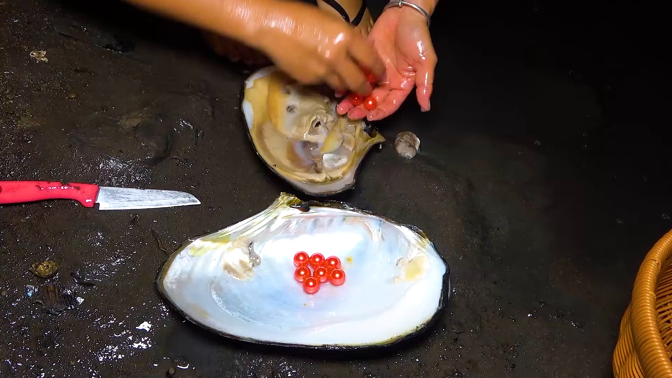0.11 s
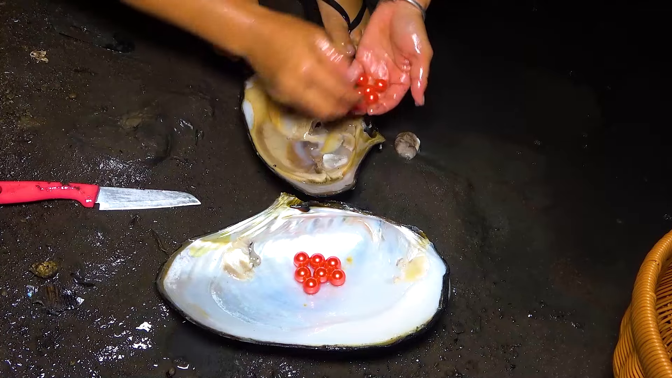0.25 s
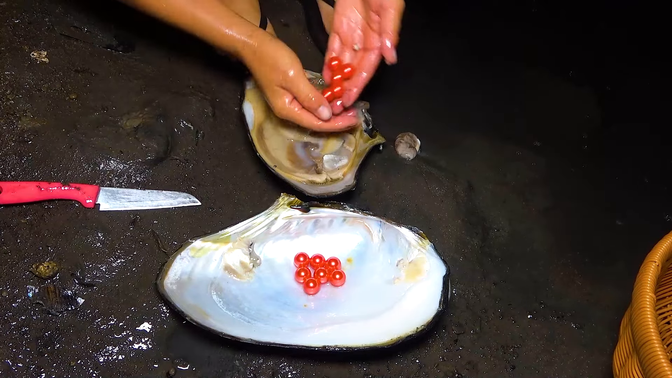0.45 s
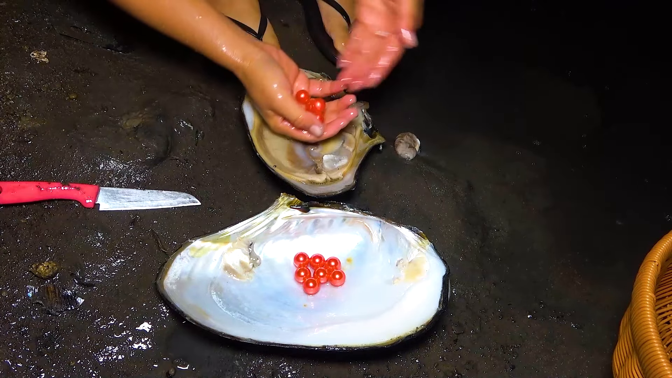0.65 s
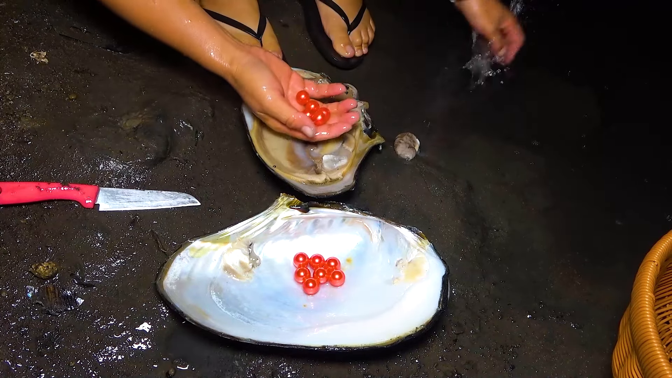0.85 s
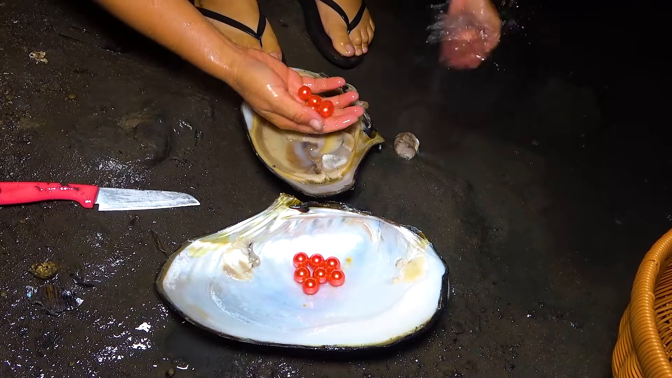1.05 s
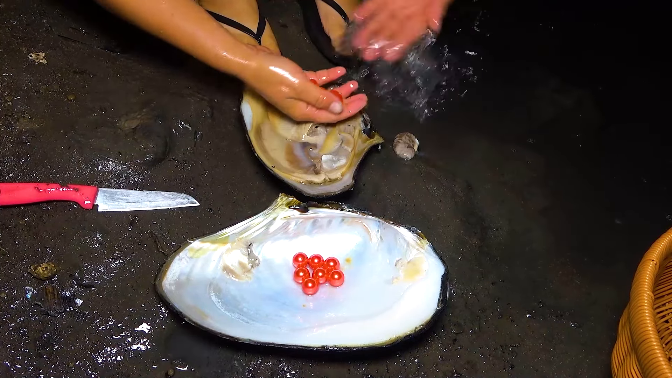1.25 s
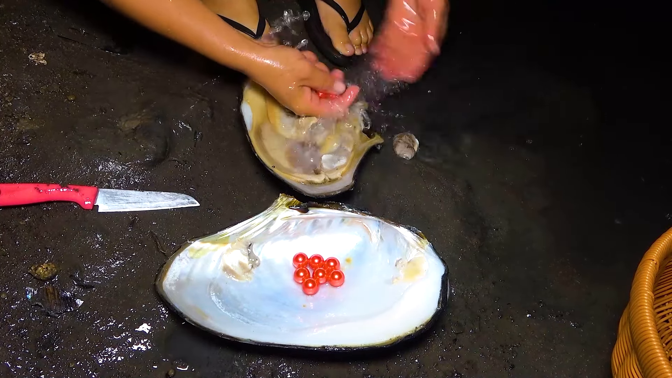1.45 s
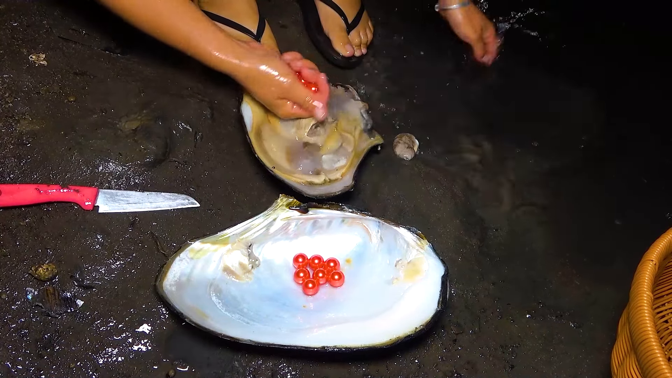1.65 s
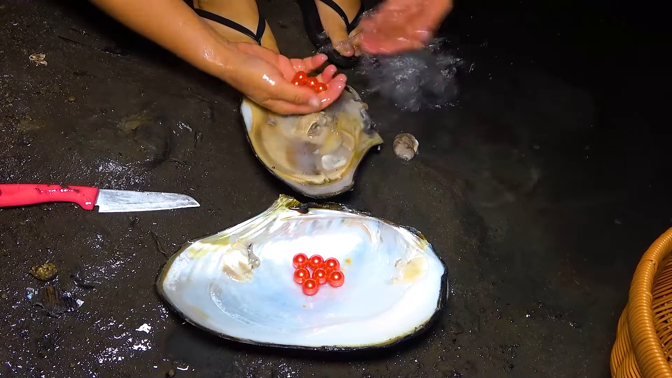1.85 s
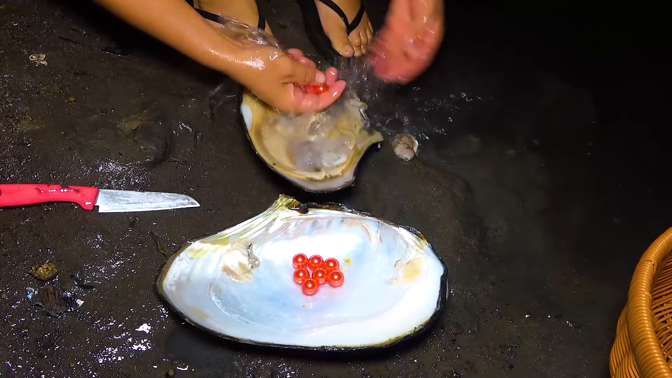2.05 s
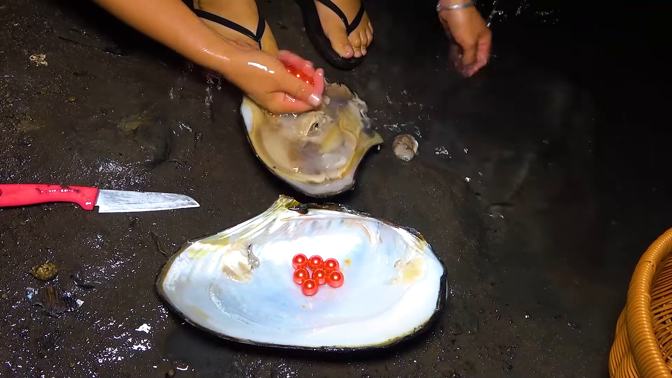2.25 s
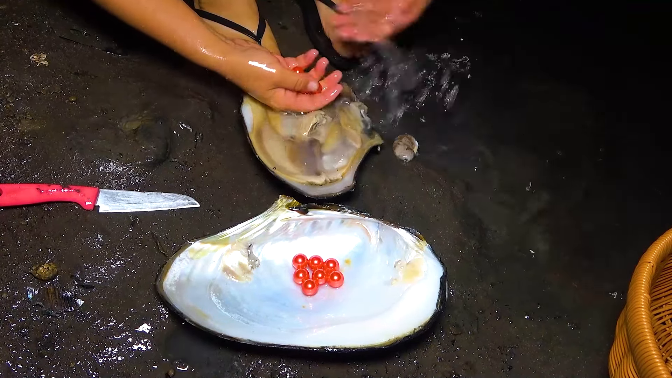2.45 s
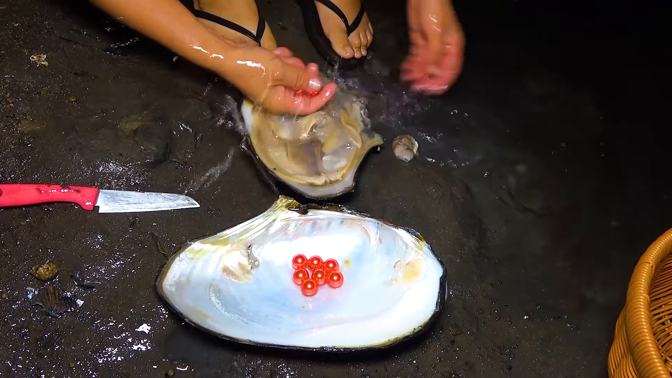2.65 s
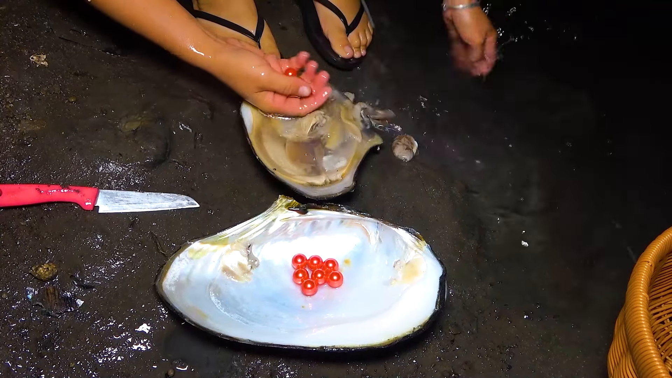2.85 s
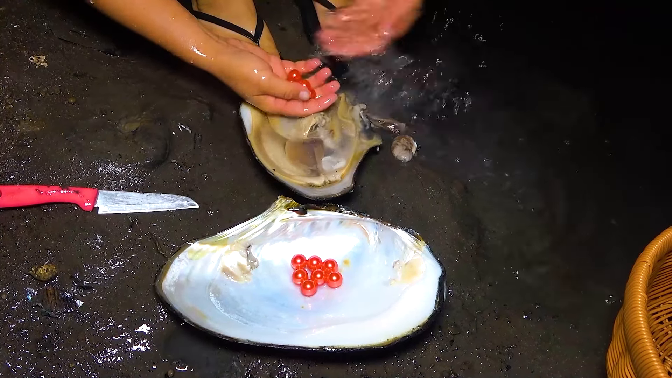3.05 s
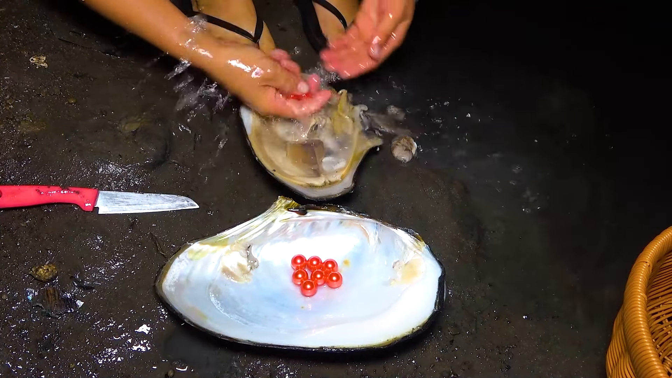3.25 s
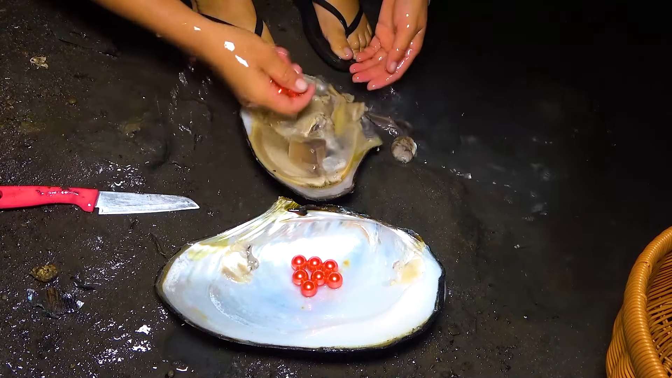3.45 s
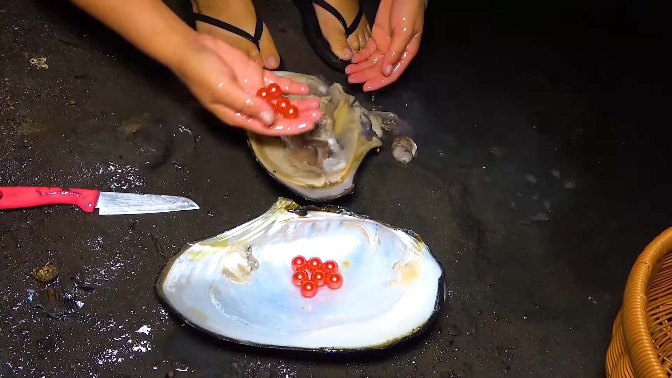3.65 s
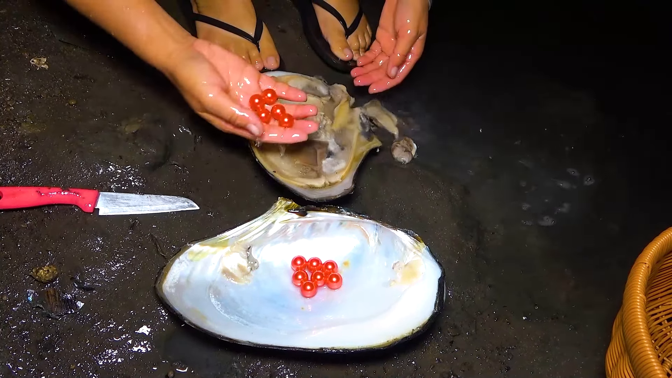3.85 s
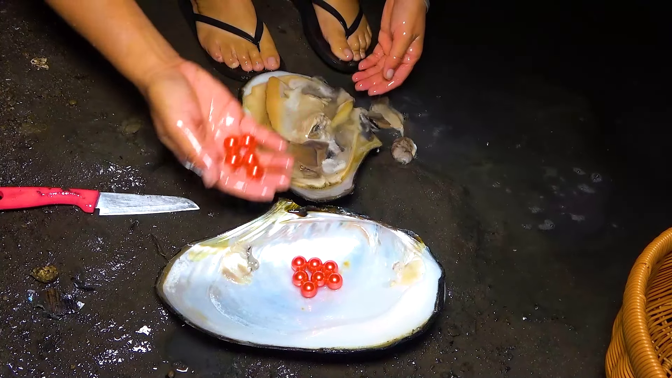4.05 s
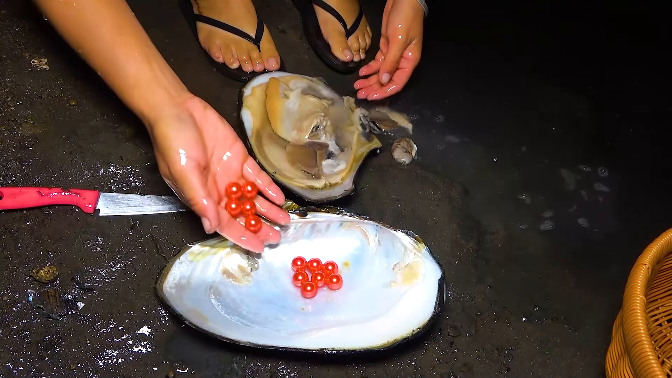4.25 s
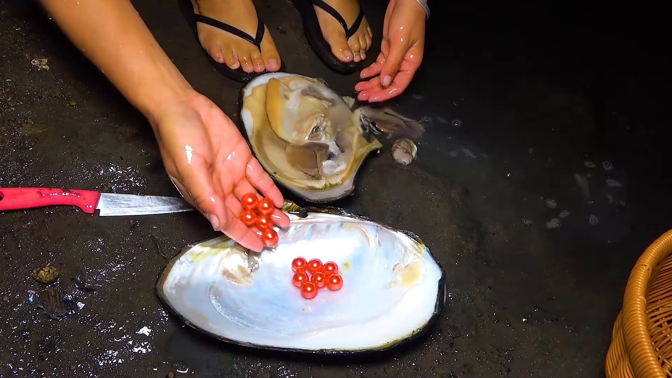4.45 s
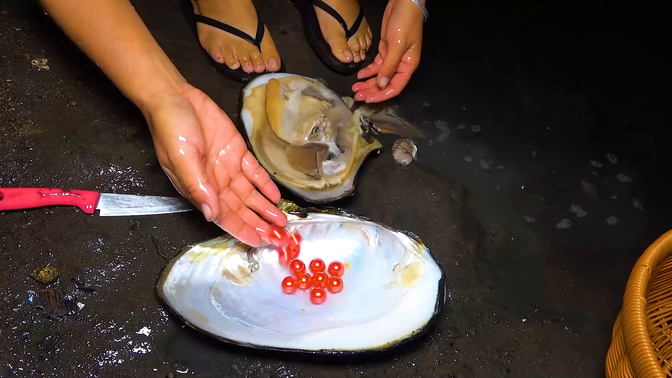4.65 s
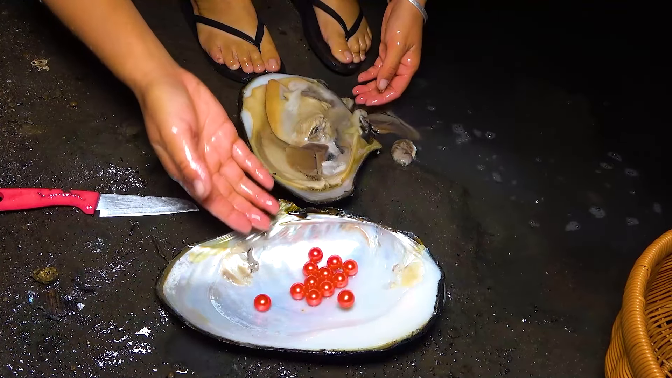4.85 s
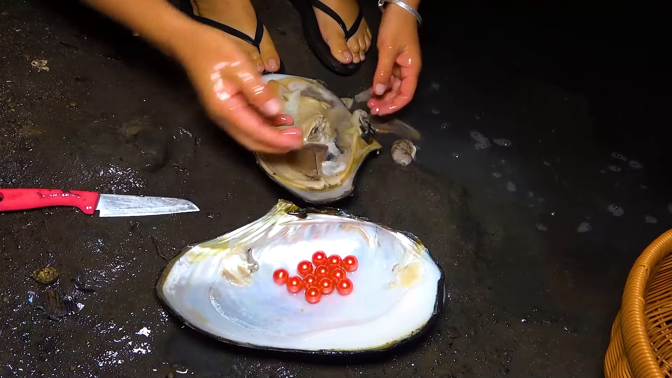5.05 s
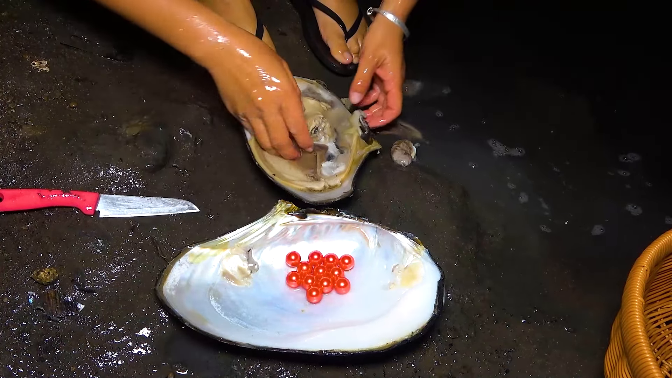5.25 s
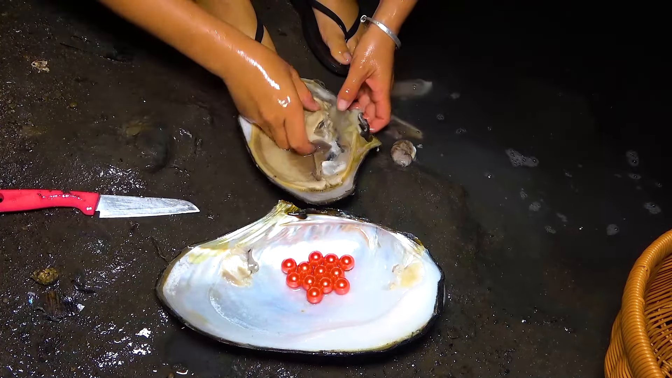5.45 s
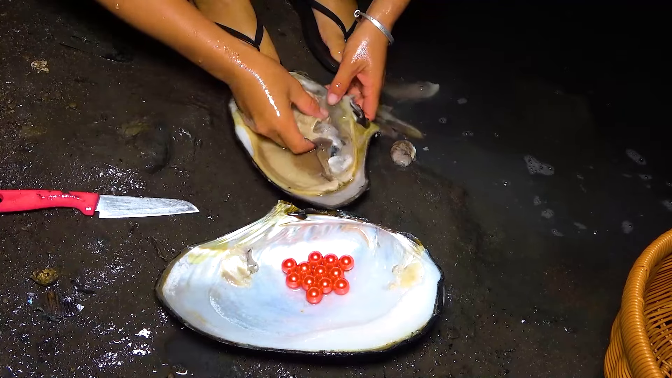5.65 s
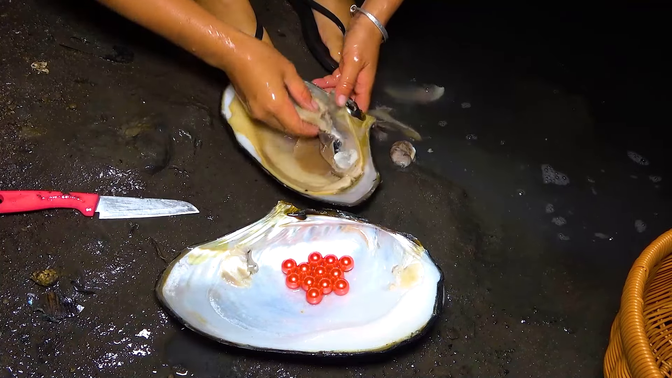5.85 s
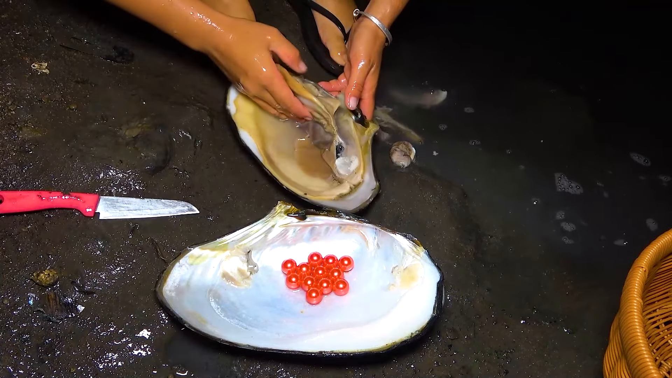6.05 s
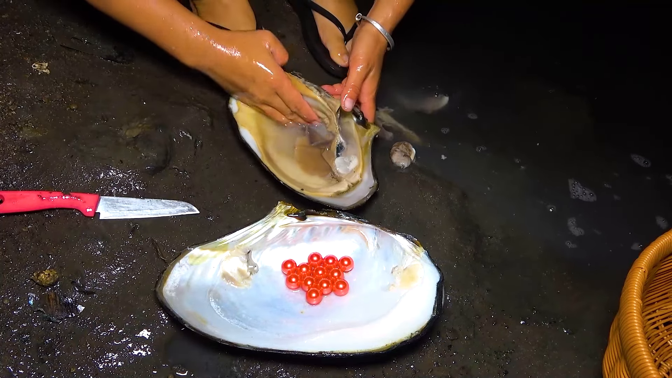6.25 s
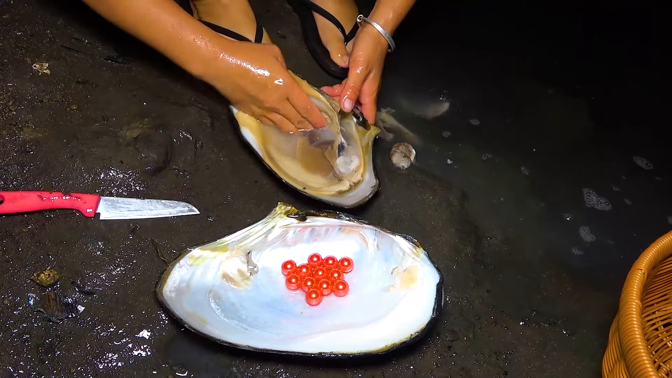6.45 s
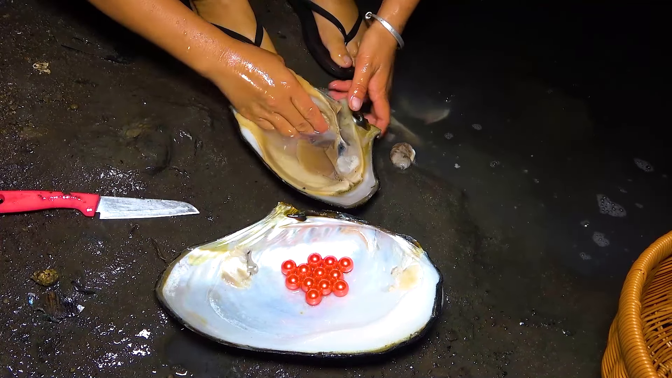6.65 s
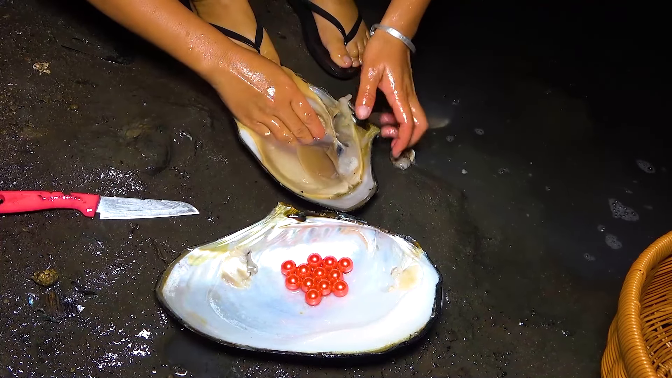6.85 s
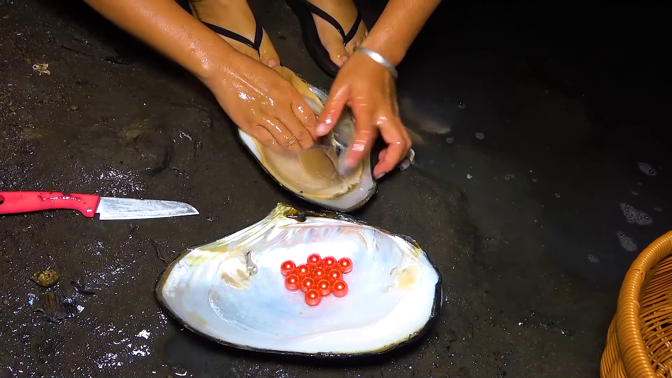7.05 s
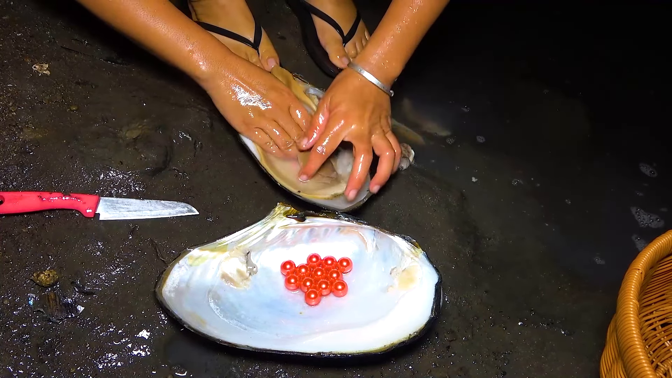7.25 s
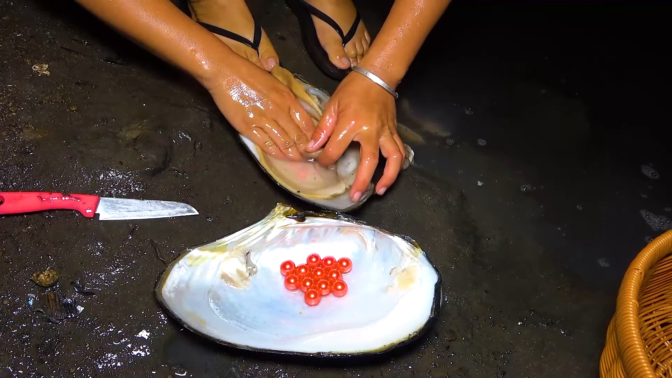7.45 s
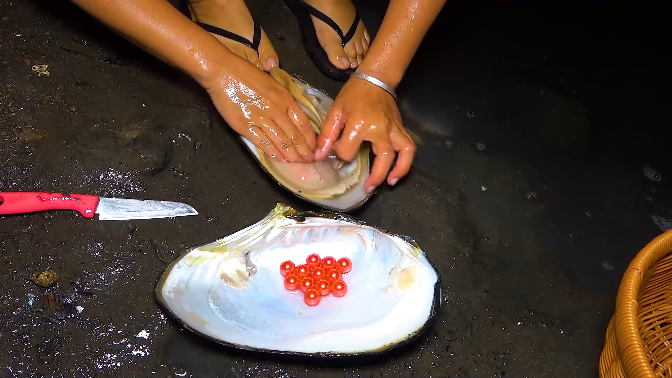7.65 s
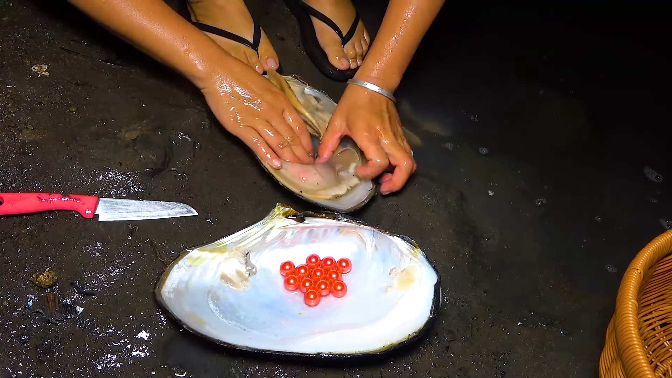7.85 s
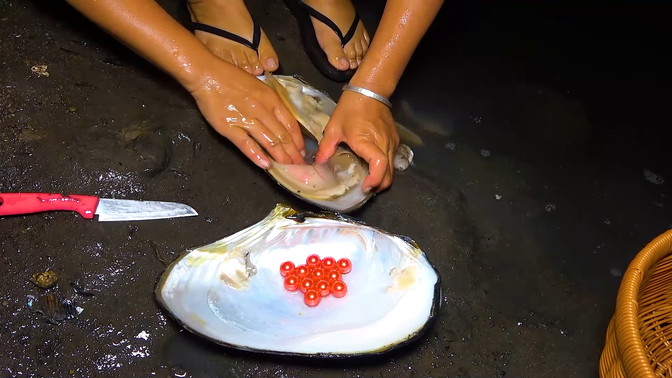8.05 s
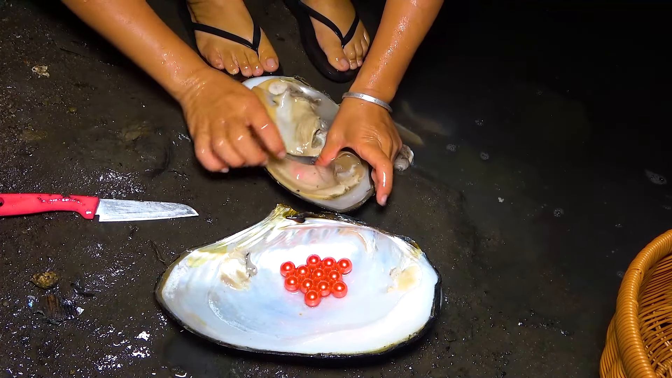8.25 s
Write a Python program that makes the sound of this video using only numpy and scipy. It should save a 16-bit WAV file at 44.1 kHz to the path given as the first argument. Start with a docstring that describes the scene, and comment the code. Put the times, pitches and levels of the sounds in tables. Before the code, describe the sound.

Small pearls click in a wet palm, a hand splashes shallow water four times, pearls bounce ringing into a shell, then dull wet mussel knocks.

```python
"""Over quiet air, pearls click in a palm; then a hand scoops water from a shallow pool and throws it four times.
The water is clouds of ringing bubbles, hissing spray and single plops; it drains away into soft high hisses.
Pearls then drop and bounce into an empty shell, which cracks and rings at its own pitches.
Last, fingers work in a wet mussel with dull, damped knocks. All is nearly mono, with a long reverberation."""
import sys
import numpy as np
from scipy import signal
from scipy.fft import rfft, irfft, next_fast_len
from scipy.io import wavfile
from scipy.ndimage import uniform_filter1d, minimum_filter1d, map_coordinates

SR = 44100
rng = np.random.default_rng(int(sys.argv[2]) if len(sys.argv) > 2 else 0)


def master(y):
    """Save y as 16-bit WAV."""
    cut = np.clip(np.atleast_2d(y).T, -1, 1)
    pcm = np.round(cut * 32767)  # scale
    wavfile.write(sys.argv[1], SR, pcm.astype(np.int16))


N = 366030


def amp(db):
    """Turn decibels into a gain."""
    return 10 ** (np.asarray(db) / 20)


def unit(x):
    """Scale a sound to an average (rms) level of 1."""
    return x / np.sqrt(np.mean(x ** 2) + 1e-20)


def peaked(x):
    """Scale a sound so that its peak is 1."""
    return x / (np.abs(x).max() + 1e-20)


def sized(x):
    """Scale a short sound to the energy of one millisecond at rms 1."""
    return x / np.sqrt(np.sum(x ** 2) * 1000 / SR + 1e-20)


def along(points, hz):
    """Read values between (Hz, value) points, on a log frequency axis."""
    f, v = np.transpose(points)
    return np.interp(np.log(hz + 1), np.log(f + 1), v)


def filtered(x, response):
    """Multiply the spectrum of a whole track by a response of frequency."""
    m = next_fast_len(N + SR // 2)
    hz = np.fft.rfftfreq(m, 1 / SR)
    return irfft(rfft(x, m) * response(hz), m)[..., :N]


def coloured(x, gain_db, size=4096):
    """Filter a short sound to a dB response without any sound before its start."""
    wanted = amp(gain_db(np.fft.rfftfreq(size, 1 / SR)))
    # folding the cepstrum forward in time makes the filter causal
    cepstrum = irfft(np.log(np.maximum(wanted, 1e-6)))
    cepstrum[1:size // 2] *= 2
    cepstrum[size // 2 + 1:] = 0
    return irfft(rfft(x, size) * np.exp(rfft(cepstrum)))


def add(track, s, sound):
    """Mix a sound into the track at time s."""
    part = track[max(round(s * SR), 0):][:len(sound)]
    part += sound[:len(part)]


def noise(spectrum):
    """Coloured noise of rms 1."""
    return unit(filtered(rng.standard_normal(N), lambda hz: amp(along(spectrum, hz))))


def wobble(rate):
    """A smooth random curve with a given number of random points a second."""
    points = rng.standard_normal(2048)
    return map_coordinates(points, [np.arange(N) * rate / SR], order=2, mode="wrap")


def swell(s, rise, fall):
    """A gain that climbs 20 dB in the rise time, peaks at s and sinks 20 dB in the fall time."""
    t = np.arange(N) / SR - s
    return amp(-20 * np.maximum(-t / rise, t / fall))


def snap(t60, rattle, size=4096):
    """A hard contact: one impulse, then a random scatter that sinks 60 dB in t60 seconds."""
    t = np.arange(size) / SR
    return (t == 0) + rattle * rng.standard_normal(size) * amp(-60 * t / t60)


def bubble(t, hz, cycles, rise):
    """A bubble dies by 60 dB over some cycles; its pitch rises as it nears the surface."""
    age = t * hz / cycles
    tone = np.sin(2 * np.pi * hz * t * (1 + rise * np.minimum(age, 1) / 2))
    onset = 1 - np.exp(-2 * hz * t)
    return tone * amp(-60 * age) * onset


def ringing(modes, near_hz, focus_db, size=4096):
    """A struck shell rings in its modes; the place that is struck favours those near one pitch."""
    hz, width, db = np.transpose(modes)[:, :, None]
    t = np.arange(size) / SR
    # each strike varies a little
    strength = amp(db + rng.standard_normal(hz.shape) - focus_db * np.abs(np.log2(hz / near_hz)))
    sign = rng.choice([-1, 1], hz.shape)
    tones = np.sin(2 * np.pi * hz * t) * np.exp(-np.pi * width * t)  # a wide mode dies quickly
    return sized(np.sum(strength * sign * tones, axis=0))


# colour of the quiet air, before it is set to AIR_DB: [f/Hz, level/dB]
AIR_COLOUR = [(15, -43.5), (25, -11.5), (285, -9), (451, -8.5), (818, -4), (1190, -5), (1650, -19),
              (3340, -17), (5730, -17), (8590, -20.5), (16000, -25)]
AIR_DB = -59


def quiet_air():
    """Still air is a steady, faint coloured noise."""
    return amp(AIR_DB) * noise(AIR_COLOUR)


# sharp wet ticks of pearls, drops and shell: [t/s, relative level/dB, centre f/Hz]
TICKS = [(0.106, -24, 5000), (0.2857, -11, 7400), (0.343, -14.5, 5900), (0.377, -22, 5200),
         (0.590, -12.5, 8900), (0.604, -11, 7200), (0.645, -16, 4800), (0.913, -10.5, 5300),
         (1.077, -6, 2900), (1.752, 1, 5700), (2.785, -8, 8000), (3.352, -18.5, 3450), (4.41, -23.5, 5800),
         (5.727, -31.5, 3000), (6.229, -34.5, 3500), (7.213, -29, 4500), (7.627, -25.5, 6700)]
# runs of fainter ticks, as pearls settle or last drops fall:
# [start t/s, end t/s, middle of relative level/dB, middle of centre f/Hz]
PATTER = [(0.601, 0.699, -20, 6250), (3.544, 3.861, -31.5, 10500)]
# colour shared by all ticks: [f/Hz, level/dB]
TICK_COLOUR = [(300, -40.5), (1200, -5.5), (2500, -2.5), (8000, -4), (11000, -14), (16000, -30)]


def ticks():
    """Tiny hard contacts: a spike with a few milliseconds of broad ring."""
    out = np.zeros(N)
    faint = []
    for start, end, db, hz in PATTER:
        for u, v, w in rng.random(size=(5, 3)):
            faint.append((start + u * (end - start), db + 6 * (v - .5), hz * 2 ** (w - .5)))
    for s, db, hz in list(TICKS) + faint:
        contact = snap(t60=.019, rattle=.14)
        tick = coloured(contact, lambda f: along(TICK_COLOUR, f) - 9 * np.abs(np.log2((f + 1) / hz)))
        add(out, s, amp(db - 7) * sized(tick))
    return out


# how long the echo takes to sink by 60 dB: [f/Hz, duration t/s]
ECHO_T60 = [(150, 0.18), (500, 1.72), (1500, 1.46), (4000, 1.14), (8000, 1.03), (14000, 1.31)]
# colour of the echo: [f/Hz, level/dB]
ECHO_COLOUR = [(100, -21.5), (300, -5.5), (600, 0), (1500, -3.5), (4500, -3), (8000, -8.5), (14000, -12.5)]


def reverberation(x, delay, count):
    """A long tail whose deep bass dies first; its fine pattern keeps changing."""
    hz, t, z = signal.stft(rng.standard_normal((count, 2 * SR)), SR, nperseg=256)
    fading = amp(-60 * t / along(ECHO_T60, hz)[:, None])
    tails = signal.istft(z * fading, SR, nperseg=256)[1]
    tails = tails / np.linalg.norm(tails[0])
    tails = np.pad(tails, ((0, 0), (int(delay * SR), 0)))
    # the tails take turns at constant power
    turn = np.arange(N) / SR * 14 + np.arange(count)[:, None] / count
    shares = np.cos(2 * np.pi * turn / 2) * np.sqrt(2 / count)
    wet = signal.fftconvolve(x * shares, tails, axes=1)[:, :N].sum(axis=0)
    return filtered(wet, lambda f: amp(along(ECHO_COLOUR, f)))


# the hand pulls through the pool: [peak t/s, rise t/s, bubbling level/dB, deep churn level/dB]
SCOOPS = [(1.03, .1, -23, -46.5), (1.35, 0.23, -22, -32), (1.85, .04, -23, -29), (2.41, .03, -26, -36),
          (3.04, 0.2, -28, -42.5)]
SCOOP_FALL_S, SCOOP_SPRAY_DB = 0.15, -14.5  # time to sink by 20 dB; spray against bubbling
# a thrown handful lands: [peak t/s, rise t/s, spray level/dB]
THROWS = [(1.44, 0.11, -23.5), (2.095, 0.12, -25), (2.692, 0.19, -27.5), (3.255, 0.16, -27.5)]
THROW_FALL_S, THROW_CHURN_DB = .15, -16.5  # time to sink by 20 dB; churn against spray
# water runs off the hands between throws, then drains away; bubbling is against the trickle's spray
TRICKLE_DB, TRICKLE_BUBBLING_DB, DRAIN_FROM_S, DRAIN_DB_PER_S = -44, -15, 3.31, 49
WET_FROM_S, WET_UNTIL_S = 0.88, 4.0  # the span in which bubbles start


def water_motion():
    """Gains of churn, bubbling and spray: scoops mostly bubble, throws do both, a trickle joins them."""
    t = np.arange(N) / SR
    trickle = amp(TRICKLE_DB - DRAIN_DB_PER_S * np.maximum(t - DRAIN_FROM_S, 0))
    power = np.outer([0, amp(TRICKLE_BUBBLING_DB), 1], trickle) ** 2
    for s, rise, db, churn_db in SCOOPS:
        levels = amp([churn_db, db, db + SCOOP_SPRAY_DB])
        power += np.outer(levels, swell(s, rise, SCOOP_FALL_S)) ** 2
    for s, rise, db in THROWS:
        levels = amp([db + THROW_CHURN_DB, db, db])
        power += np.outer(levels, swell(s, rise, THROW_FALL_S)) ** 2
    return np.sqrt(power) * (t > WET_FROM_S)


def bubbles(hz, spread, cycles, scatter_db, count, size):
    """A cloud of bubbles of random pitch and strength, rms 1 over the wet span."""
    start, end = WET_FROM_S, WET_UNTIL_S
    when, strength = rng.random((2, count, 1))
    pitch = np.clip(hz * np.exp(spread * rng.standard_normal((count, 1))), 80, 16000)
    gain = amp(-scatter_db * np.log(np.maximum(strength, .02))) * np.sqrt(pitch / hz)
    grains = gain * bubble(np.arange(size) / SR, pitch, cycles, rise=0.65)
    index = ((start + when * (end - start)) * SR).astype(int) + np.arange(size)
    cloud = np.bincount(index.ravel(), grains.ravel(), N)[:N]
    return unit(cloud) * np.sqrt((end - start) * SR / N)


# colour of the fine spray: [f/Hz, level/dB]
SPRAY_COLOUR = [(880, -36.5), (1500, -12.5), (2100, -2.5), (2440, 1.5), (4080, -7.5), (7100, -6),
                (13700, -15), (16000, -23)]
CLUMP_DB, CLUMPS_PER_S = 2, 55  # the spray comes down in clumps


def splashes():
    """Big bubbles churn, small ones chatter, and thrown water patters and crackles on the ground."""
    churn, bubbling, spray = water_motion()
    low = bubbles(hz=495.5, spread=.48, cycles=14, scatter_db=4.5, count=1100, size=2048)
    low = filtered(low, lambda hz: 1 / np.sqrt(1 + (90 / (hz + 1)) ** 6))  # less rumble below 90 Hz
    middle = bubbles(hz=1550, spread=0.4415, cycles=44, scatter_db=1.5, count=1500, size=1024)
    droplets = amp(-1.5) * bubbles(hz=4100, spread=.5, cycles=38, scatter_db=5, count=1400, size=512)
    crackle = bubbles(hz=6700, spread=.6, cycles=5, scatter_db=4.5, count=5000, size=128)
    beads = amp(-8) * bubbles(hz=9500, spread=.3, cycles=32, scatter_db=5, count=300, size=256)
    fizz = crackle + amp(0.5) * rng.standard_normal(N)
    mist = np.std(fizz) * unit(filtered(fizz, lambda hz: amp(along(SPRAY_COLOUR, hz))))
    clumps = amp(CLUMP_DB * wobble(CLUMPS_PER_S))
    falling = spray * clumps * (amp(-3.0) * mist + droplets + beads)
    return amp(-3.5) * churn * low + amp(-2.5) * bubbling * middle + falling


# air pockets that open or close under the hand: [t/s, length t/s, start f/Hz, end f/Hz, level/dB]
GULPS = [(0.938, 0.041, 1245, 694, -28.5), (1.338, 0.073, 410.5, 571, -34), (1.734, 0.027, 1143, 1440, -24),
         (1.823, 0.045, 1389, 518, -21.5), (2.104, 0.024, 1616, 970, -24.5),
         (2.987, 0.135, 1250, 679, -38.5), (3.149, 0.076, 634, 1170, -38.5),
         (7.209, 0.078, 564.4, 1660, -47)]


def gulps():
    """Turbulence sounds an air pocket whose resonance slides as its size changes."""
    out = np.zeros(N)
    for s, length, start_hz, end_hz, db in GULPS:
        u = np.linspace(0, 1, int(length * SR))
        phase = 2 * np.pi * np.cumsum(start_hz * (end_hz / start_hz) ** u) / SR
        # two random curves, 600 points a second, roughen the sliding tone
        knots = rng.standard_normal((2, 256))
        a, b = [map_coordinates(k, [u * length * 600], mode="wrap") for k in knots]
        tone = unit(a * np.sin(phase) + b * np.cos(phase))
        add(out, s, amp(db) * tone * np.sqrt(np.abs(np.sin(np.pi * u))))
    return out


# single large bubbles and drops: [t/s, relative level/dB, pitch f/Hz]
PLOPS = [(1, -8.5, 2440), (1.03, -10, 2520), (1.052, -16.5, 1310), (1.135, -13, 1150), (1.231, -12, 1210),
         (1.477, -9.5, 2720), (1.535, -9.5, 2500), (1.756, -9, 1360), (2.021, -11, 431),
         (2.076, -7.5, 3200), (2.351, -21, 1550), (2.397, -14, 1340), (2.626, -14, 1850),
         (2.701, -11.5, 2450), (2.948, -21, 1920), (3.047, -15.5, 1120), (3.083, -18.5, 1076),
         (3.251, -17, 1730), (3.378, -12.5, 3290), (3.577, -23, 2550), (3.728, -34, 1840),
         (4.247, -22.5, 1140), (4.48, -30.5, 1220), (7.115, -41, 846)]
# smaller drops fall at random among them, around this relative level and pitch
STRAY_FROM_S, STRAY_UNTIL_S, STRAY_DB, STRAY_HZ = 1.05, 3.45, -20, 2204
RING_CYCLES, RING_GROWS = 45.4, 0.24  # cycles at 1 kHz; smaller bubbles ring for more of them
SLAP_DB, SLAP_GROWS = -1.5, 1.31  # the slap grows faster than the drop's level


def plops():
    """A drop slaps the surface and traps one large ringing bubble."""
    out, t = np.zeros(N), np.arange(4096) / SR
    strays = []
    for u, v, w in rng.random(size=(36, 3)):
        s = STRAY_FROM_S + u * (STRAY_UNTIL_S - STRAY_FROM_S)
        strays.append((s, STRAY_DB + 8 * (v - .5), STRAY_HZ * 4 ** (w - .5)))
    for s, db, hz in list(PLOPS) + strays:
        contact = snap(t60=.055, rattle=.35)
        slap = sized(coloured(contact, lambda f: -8 * np.log2((f + 1) / hz) ** 2))
        ring = peaked(bubble(t, hz, cycles=RING_CYCLES * (hz / 1000) ** RING_GROWS, rise=0.046))
        add(out, s, amp(db - 2.5) * ring + amp(SLAP_GROWS * db + SLAP_DB) * slap)
    return out


# soft high hisses: [peak t/s, rise t/s, level/dB, centre f/Hz]
HISSES = [(4.009, 0.021, -57, 10380), (4.45, 0.36, -57.5, 9500), (7.634, .01, -47.5, 6670),
          (7.84, 0.16, -54.5, 7360)]
HISS_FALL_S, HISS_SKIRT_DB = 0.24, 32  # time to sink by 20 dB; loss one octave from the centre


def hisses():
    """Narrow swells of high noise while the wet hands move."""
    out = np.zeros(N)
    for s, rise, db, hz in HISSES:
        source = rng.standard_normal(N)
        band = filtered(source, lambda f: amp(-HISS_SKIRT_DB * np.log2((f + 1) / hz) ** 2))
        out += amp(db) * swell(s, rise, HISS_FALL_S) * unit(band)
    return out


# pearls landing and bouncing in the empty shell:
# [t/s, relative level/dB, pitch that the strike favours f/Hz, relative thud level/dB]
DROPS = [(4.647, 2.5, 3850, -38.5), (4.6989, -1.5, 3790, -39), (4.7066, -9.5, 3750, -52),
         (4.7255, -5, 2830, -57), (4.7491, -11, 4270, -72), (4.7727, 2.5, 2610, -40),
         (4.7959, 1, 4080, -42.5), (4.8017, -0.5, 4270, -35.5), (4.8206, -3.5, 4150, -29.5),
         (4.8559, -3, 4500, -52), (4.8648, -4, 4200, -66), (4.9003, -9, 3850, -63),
         (4.921, -2.5, 3740, -75), (4.9555, 0, 4420, -78), (5.0261, 0.5, 4130, -67),
         (5.1093, -2, 3830, -54)]
# ringing modes of the empty shell: [f/Hz, width f/Hz, level/dB]
SHELL_MODES = [(1885, 25, -5.5), (2830, 42, -6.5), (3100, 27, -6), (3850, 88, 3.5), (4270, 95, -36),
               (5000, 220, 12), (5590, 270, 17), (7190, 280, -16)]
# colour of the contact of pearl on shell: [f/Hz, level/dB]
CLACK_COLOUR = [(290, -58), (500, -37.5), (1210, -11), (2330, -13.5), (2770, -3), (3490, -3.5), (4340, 4.5),
                (5310, -1.5), (7420, -3.5), (16000, -39)]


def pearls():
    """Each landing cracks and rings the shell; the heavy ones thud through to the ground."""
    out, thuds = np.zeros(N), np.zeros(N)
    # colour of the ground: [f/Hz, level/dB]
    ground = [(20, -26), (60, 0.5), (150, 3), (300, 2.5), (550, 0), (1200, 0.5), (4000, -55)]
    for s, db, favoured_hz, thud_db in DROPS:
        crack = sized(coloured(snap(t60=.012, rattle=.16), lambda f: along(CLACK_COLOUR, f)))
        ring = ringing(SHELL_MODES, favoured_hz, focus_db=26)
        add(out, s, amp(db - 10.5) * ring + amp(db - 1.5) * crack)
        thud = sized(coloured(snap(t60=0.014, rattle=.02), lambda f: along(ground, f)))
        add(thuds, s, amp(thud_db + 20) * thud)
    return out, thuds


# fingers knocking in the full mussel: [t/s, relative level/dB, pitch that the knock favours f/Hz]
KNOCKS = [(5.477, -21, 3626), (5.607, -33.5, 2800), (6.615, -26.5, 1010), (6.717, -29.5, 3580),
          (6.725, -30.5, 1060), (6.823, -39, 3560), (6.954, -29.5, 1120), (6.972, -31.5, 1820),
          (6.99, -30, 3540), (7.433, -36.5, 958), (8.045, -44.5, 1200), (8.214, -33.5, 1220),
          (8.227, -29.5, 1130)]
# colour of the knock: [f/Hz, level/dB]
MUSSEL_COLOUR = [(150, -43), (250, -29), (507, -1), (675, -7), (1080, 2), (1820, -18.5), (2090, -13.5),
                 (3640, -5.5), (6670, -18.5), (14000, -40)]
# ringing modes of the full mussel: [f/Hz, width f/Hz, level/dB]
MUSSEL_MODES = [(555, 23, -16.5), (1120, 57, -11.5), (1747, 93, -0.5), (2465, 29, -6.5), (2915, 20, -8.5),
                (3240, 48, -14), (3560, 29.7, -6)]


def knocks():
    """Flesh damps the full mussel, so it answers with a dull knock and a short ring."""
    out = np.zeros(N)
    for s, db, favoured_hz in KNOCKS:
        contact = snap(t60=.038, rattle=.3)
        knock = coloured(contact, lambda f: along(MUSSEL_COLOUR, f) - 6 * np.abs(np.log2((f + 1) / favoured_hz)))
        ring = ringing(MUSSEL_MODES, favoured_hz, focus_db=15)
        add(out, s, amp(db + 0.5) * sized(knock) + amp(db - 8.5) * ring)
    return out


# left minus right for the pool, which leans right in the lower middle: [f/Hz, level/dB]
POOL_PAN = [(60, 0.5), (150, 4.5), (380, -3), (600, -4), (1050, -3.5), (2000, 0), (5980, 0.5), (12000, 0)]
# side (left-right difference) gain of the reverberation: [f/Hz, level/dB]
ECHO_WIDTH = [(100, 1), (700, -17.5), (2000, -21.5), (3500, -33), (4600, -17.5), (6000, -5.5),
              (15000, -5.5)]
# side minus mid for the air: [f/Hz, level/dB]
AIR_WIDTH = [(100, -3.5), (1000, -9.5), (2000, -9), (4200, -23.5), (6000, -2.5), (15000, -7)]
SPRAY_SIDE_DB, SPRAY_LAG_S = -10, .004  # late, softer water in the side, against the echo's width


def scene():
    """Water, pearls and mussel in one reverberant space; echo, air and late water give the width."""
    air, air_side = quiet_air(), quiet_air()
    water, drips = splashes() + gulps(), plops()
    clacks, thuds = pearls()
    fingers = ticks() + knocks()
    pool_send = amp(-4.0) * water + amp(-5) * drips
    shell_send = amp(-2.5) * clacks + amp(-4) * fingers
    pool = water + drips + reverberation(pool_send, delay=.011, count=3)
    pool = filtered(pool, lambda hz: amp(np.array([along(POOL_PAN, hz), -along(POOL_PAN, hz)]) / 2))
    shells = clacks + thuds + fingers + hisses() + reverberation(shell_send, delay=.011, count=4)

    echo_side = reverberation(pool_send + shell_send, delay=0.0026, count=2)
    side = filtered(echo_side, lambda hz: amp(along(ECHO_WIDTH, hz)))
    side += filtered(air_side, lambda hz: amp(along(AIR_WIDTH, hz)))
    side += filtered(water, lambda hz: amp(along(ECHO_WIDTH, hz) + SPRAY_SIDE_DB)
                     * np.exp(-2j * np.pi * hz * SPRAY_LAG_S))
    return pool + shells + air + np.array([side, -side])


def limited(x, ceiling_db, size):
    """A fast look-ahead limiter ducks everything around each peak above the ceiling."""
    needed = np.minimum(1, amp(ceiling_db) / (np.abs(x).max(axis=0) + 1e-9))
    return x * uniform_filter1d(minimum_filter1d(needed, size), size)


TOP_HZ = 16000


def record(dry):
    """The peaks are limited, then a steep filter removes what lies above the band limit."""
    held = limited(dry, ceiling_db=-4.5, size=121)  # size in samples
    return filtered(held, lambda hz: 1 / np.sqrt(1 + (hz / TOP_HZ) ** 240))


dry = scene()
out = record(dry)
master(out)
```